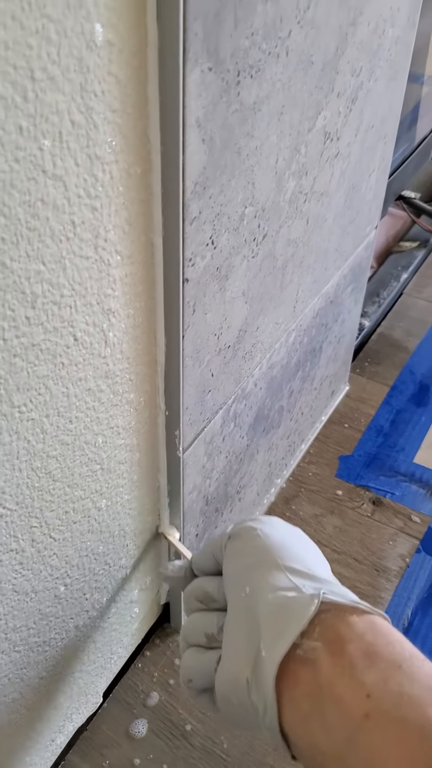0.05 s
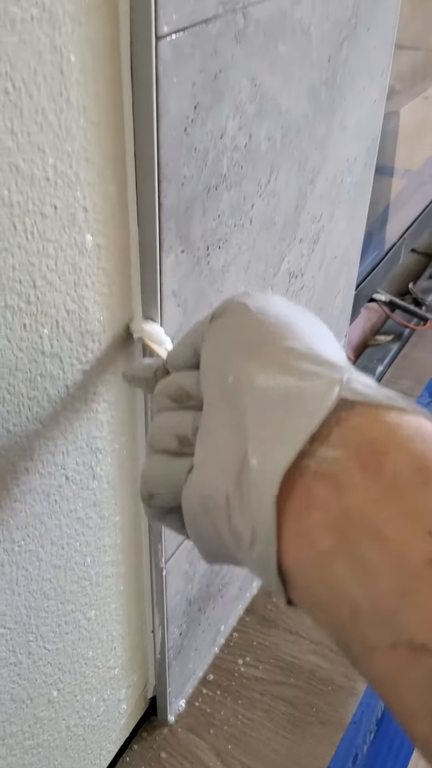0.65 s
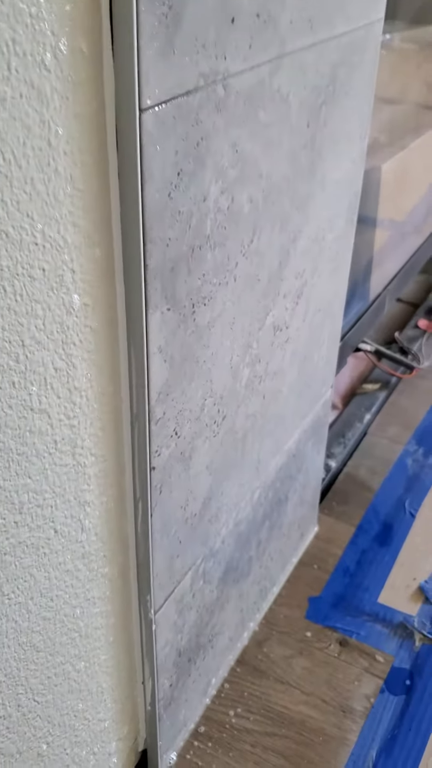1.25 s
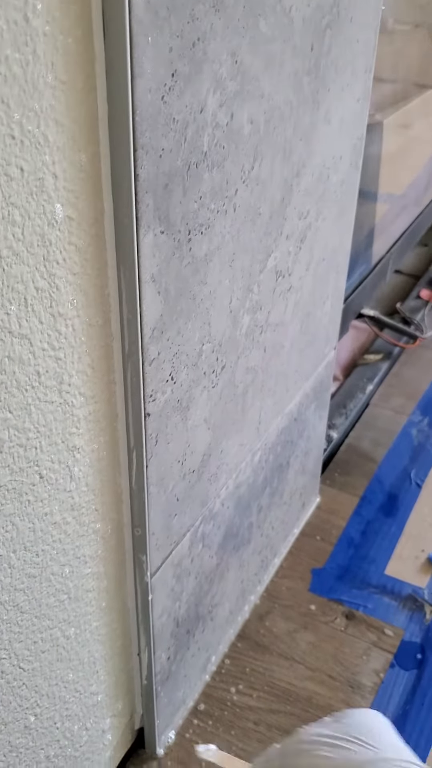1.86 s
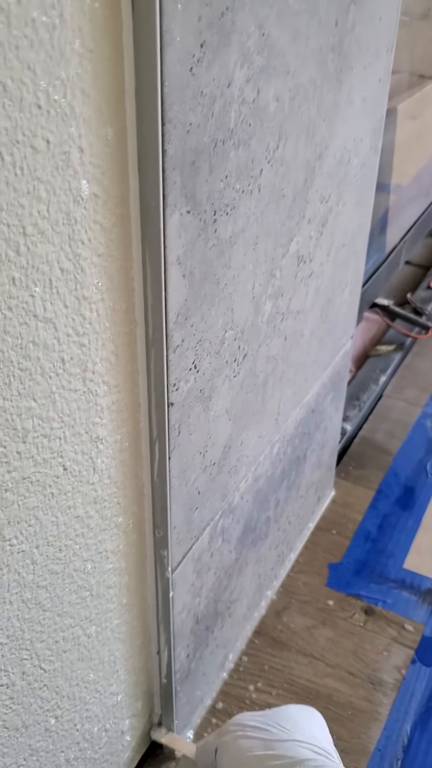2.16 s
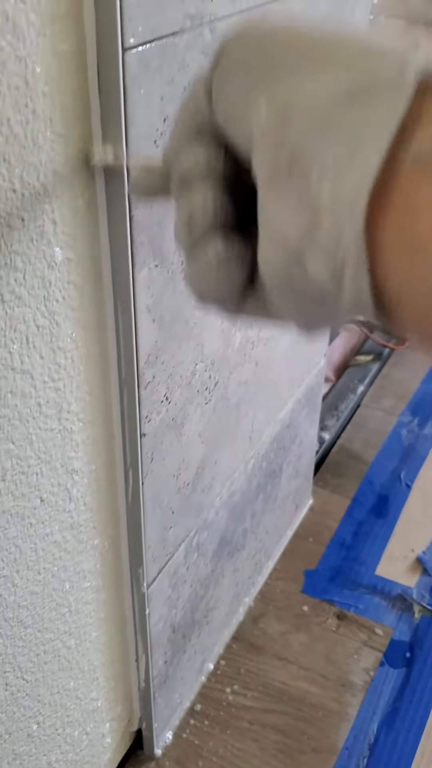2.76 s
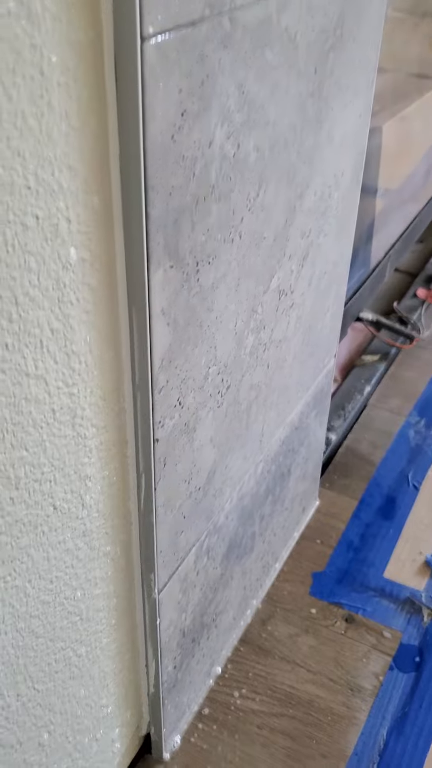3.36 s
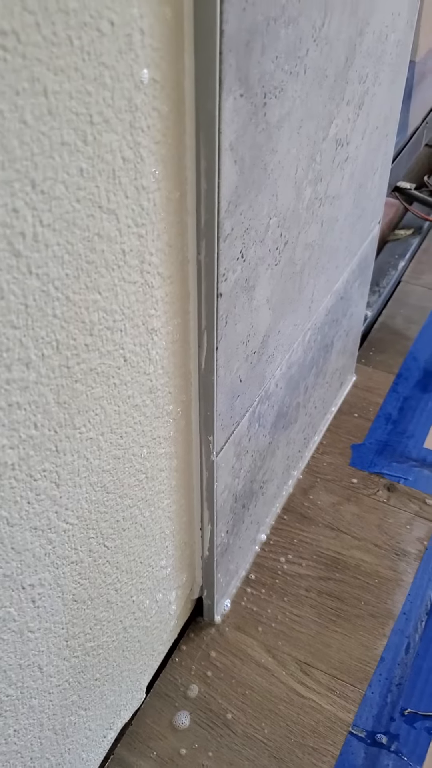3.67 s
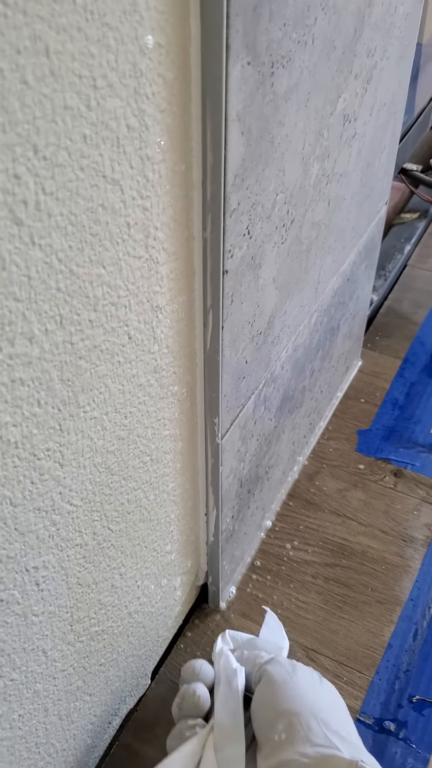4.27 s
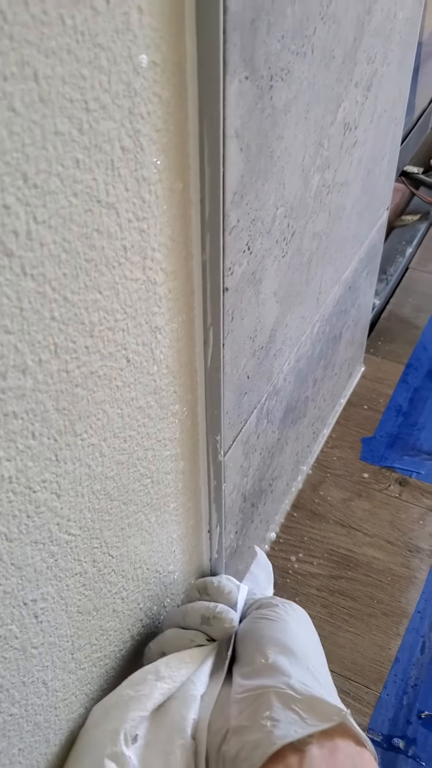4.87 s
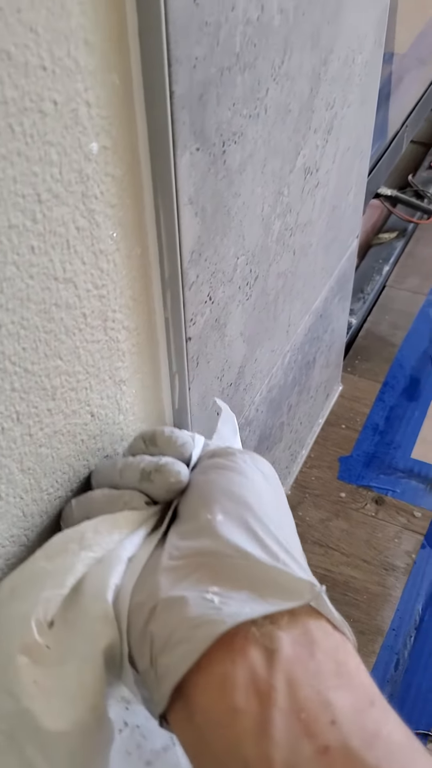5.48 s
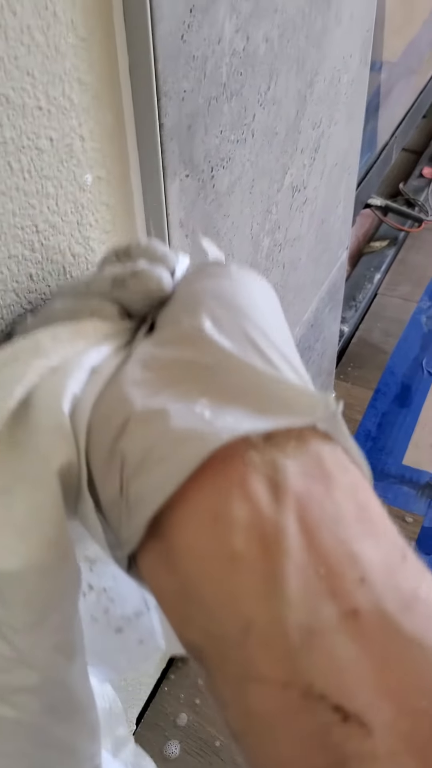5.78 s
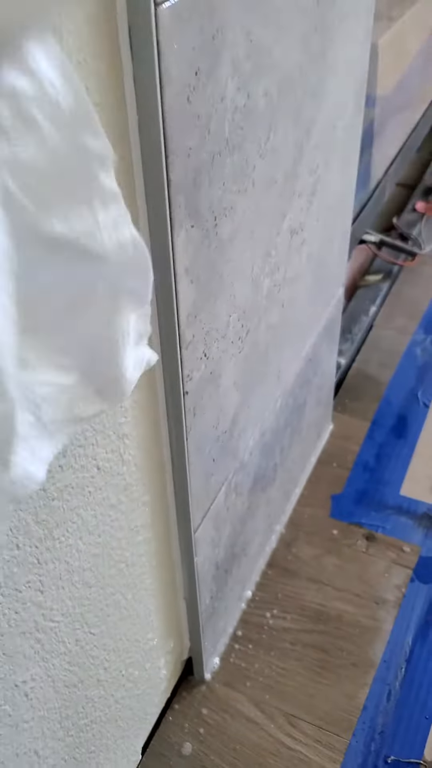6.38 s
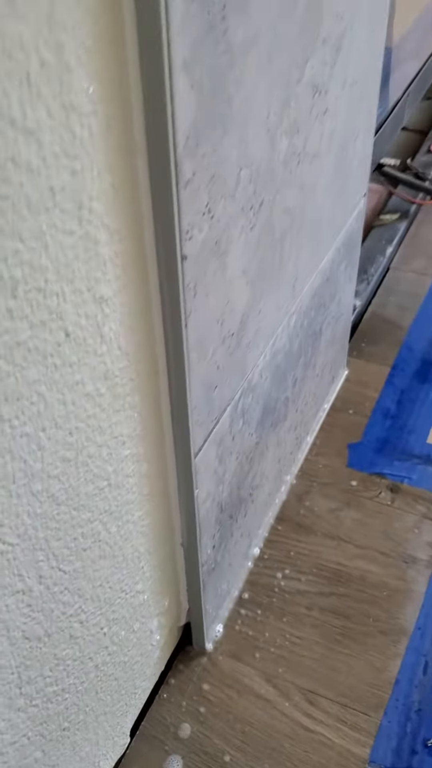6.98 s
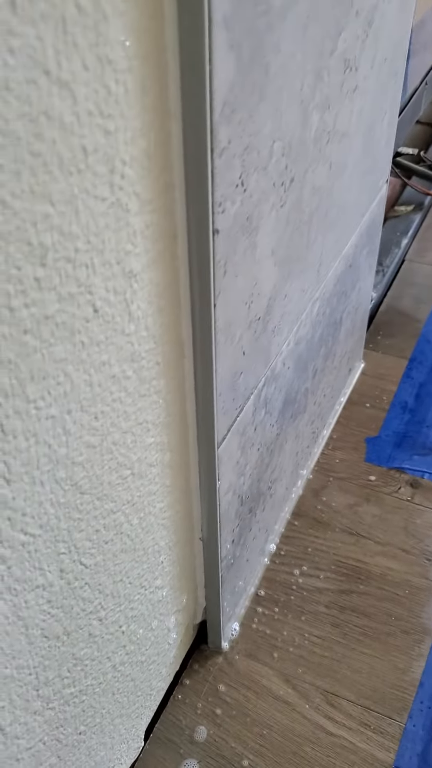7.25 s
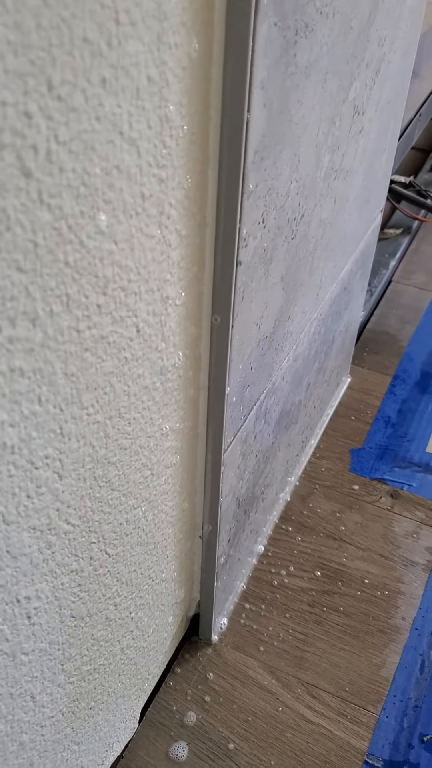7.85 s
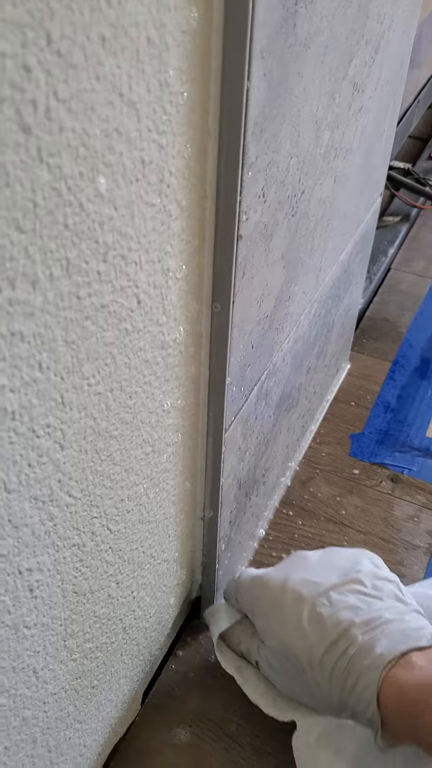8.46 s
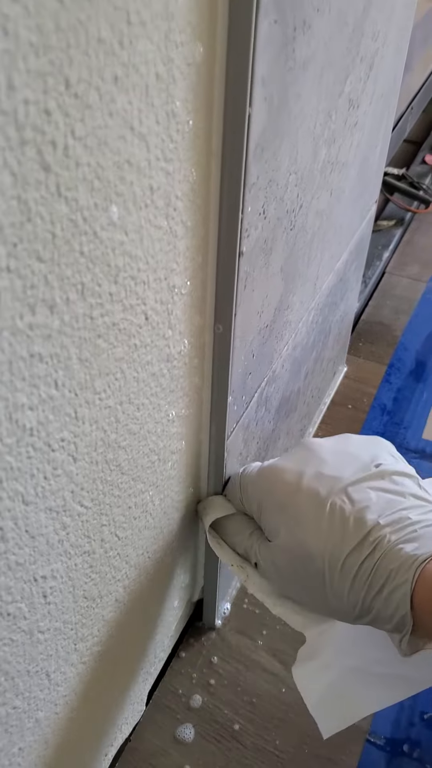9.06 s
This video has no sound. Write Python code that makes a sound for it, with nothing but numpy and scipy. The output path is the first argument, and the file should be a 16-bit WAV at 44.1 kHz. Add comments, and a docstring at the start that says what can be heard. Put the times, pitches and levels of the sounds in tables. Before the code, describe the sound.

In a bare room, a small stick rubs up a wall joint through soft sealant, with low hollow thuds. It is knocked once, sharply, then scrapes up bare plaster with a louder, chattering rasp. Small ticks follow as it is put down. A paper towel rustles, wipes the joint and flaps past the close microphone with puffs of air. A sleeve swishes, and the towel briefly dabs the wall.

```python
"""A bare room, at the joint between a tiled panel and a textured plaster wall. A gloved hand draws a small
stick up the joint twice, through soft sealant, then over bare plaster: its slips drum the hollow wall and
its catches ring the panel's metal trim. Between the strokes it is knocked once; after them it is put down,
with small ticks close by. A paper towel rustles, wipes the joint and flaps past the microphone, puffing
air at it. A sleeve swishes, and the towel dabs the wall."""
import sys
import numpy as np
from scipy import signal
from scipy.fft import rfft, irfft, next_fast_len
from scipy.io import wavfile

SR = 44100
rng = np.random.default_rng(int(sys.argv[2]) if len(sys.argv) > 2 else 0)


def generate_wav(sig):
    """Save sig (samples, or channels by samples) to the path in sys.argv[1] as 16-bit PCM at SR."""
    pcm = np.round(np.clip(np.atleast_2d(sig).T, -1, 1) * 32767).astype(np.int16)
    wavfile.write(sys.argv[1], SR, pcm)


N = 402191
T = np.arange(N) / SR

# hand pressure in each stroke: time_s, pressure_db
SEALANT_PRESSURE = [(0, -1), (0.2, 0), (0.58, 1), (0.7, -1), (0.79, 0.5), (0.95, 4), (1.075, 5.5),
                    (1.105, 1)]
PLASTER_PRESSURE = [(2.25, -26), (2.31, -16.5), (2.37, -5.5), (2.41, -1.5), (2.54, 0.5), (2.6, 0),
                    (2.66, 1), (2.79, -0.5), (2.83, -1.5), (2.93, -1), (2.97, -1), (3.0, -3.5), (3.02, -1),
                    (3.035, -4.5)]
WIPE_PRESSURE = [(4.78, -14.5), (4.99, -7), (5.04, -2.5), (5.32, 0.5), (5.7, 0), (6.2, -2.5), (6.32, -0.5),
                 (6.345, -13)]
DAB_PRESSURE = [(8.78, -11), (8.87, -6.5), (8.94, -2.5), (9.12, -1)]
# response of drum, board, rasp, scratch, hiss (a row each): level_db, db_per_pressure_db, climb_db
SEALANT_BANDS = [(-35, 0.37, 10), (-46, 1.7, 8.5), (-53.5, 2.3, -6.5), (-55, 1.74, 0), (-55, 0.17, 1.5)]
PLASTER_BANDS = [(-30.5, 0.97, -3), (-33, 0.94, 0.5), (-34.5, 1.18, 6), (-49.5, 1.4, 34), (-45.5, 0.89, -3)]
WIPE_BANDS = [(-46, 2.3, 11), (-49, 0.83, 7), (-46, 1.08, 0.5), (-52.5, 0.8, 8.5), (-55, 0.74, 10)]
DAB_BANDS = [(-86, 1.3, 12), (-91, 1.1, 12), (-67.5, 1.4, 4.6), (-56, 0.68, 1.4), (-52.5, 1.5, 1)]
# limits of those five bands: edge_hz
BAND_EDGES_HZ = (45, 220, 650, 2800, 5500, 17000)
# friction spectra of stick and grit: freq_hz, level_db
SEALANT_SPECTRUM = [(21, -71), (35, -39), (66, -2), (93, 2), (176, -7.5), (222, -15.5), (379, -19),
                    (684, -25), (979, -16.5), (1140, -23.5), (1550, -18.5), (3350, -28), (10600, -49.5),
                    (12100, -49), (16000, -48.5)]
PLASTER_SPECTRUM = [(21, -71), (35, -22), (82, 3), (108, 7.5), (210, 0), (258, 3), (334, -4.5), (370, -3.5),
                    (684, -13.5), (930, -11.5), (1200, -21.5), (1590, -21), (4220, -36.5), (8010, -52.5),
                    (10000, -55), (13000, -53.5), (16000, -57)]
GRIT_SPECTRUM = [(1000, -9), (4500, -9), (7000, 0.5), (9000, -13), (12000, 5), (16000, 8.5)]
# contact resonances: start_s, length_s, pitch_hz, width_hz, level_db, sink_oct_per_s
SQUEAKS = [(0, 0.13, 4250, 690, -54.5, 0.48), (0.17, 0.17, 3530, 320, -52.5, 0.9),
           (0.3, 0.16, 3520, 340, -53.5, 0.85), (0.47, 0.14, 3250, 300, -54.5, 0.13),
           (0.14, 0.16, 4740, 850, -53.5, 0.88), (0.22, 0.16, 2740, 260, -53, 0.8),
           (0.37, 0.14, 2385, 380, -55, 0.65), (0.62, 0.14, 1900, 230, -55, 1.0),
           (0.73, 0.19, 5200, 1000, -54.5, 0.73), (2.762, 0.088, 4630, 800, -40.5, 1.5),
           (2.85, 0.14, 4820, 650, -42, 1.4), (2.84, 0.18, 1600, 300, -34, 0.39),
           (2.95, 0.058, 2890, 340, -31, 0.093), (3.741, 0.016, 7200, 1080, -59.5, 0),
           (5.02, 0.2, 1750, 650, -57.5, 0.255), (5.25, 0.35, 1947, 600, -50.5, 0.2),
           (5.47, 0.27, 1200, 130, -51, 0.57), (5.42, 0.2, 2660, 394, -55.5, 0.44),
           (5.6, 0.66, 2056, 400, -49, 0.64), (5.88, 0.26, 4800, 800, -51.5, 0.82),
           (6.19, 0.14, 4770, 754, -62, 0.4)]
# wall pushed or springing back: start_s, length_s, pitch_hz, width_hz, relative_db
BOOMS = [(0, 0.2, 394, 90, -47), (0.789, 0.29, 375.6, 70, -56), (0.9, 0.22, 783, 260, -45),
         (2.316, 0.073, 387, 129, -39.5), (2.391, 0.07, 387.3, 100, -26.5), (2.44, 0.1, 275.6, 61, -26.5),
         (2.46, 0.09, 359, 90, -32.5), (2.68, 0.13, 507.4, 110, -31), (2.659, 0.15, 385.6, 91, -27),
         (2.68, 0.089, 131.3, 40.3, -21), (2.76, 0.054, 234, 70.5, -25), (2.765, 0.041, 150.4, 60, -20.5),
         (2.844, 0.113, 102.2, 26, -21.5), (3.001, 0.044, 386, 60, -35), (3.01, 0.025, 102.4, 30.2, -22.5),
         (5.006, 0.24, 385, 170, -45.5), (5.5, 0.27, 93.6, 36, -42), (6.287, 0.052, 400, 200, -45.5)]
# grit under the stick: start_s, length_s, level_db
GRIT = [(0.05, 0.65, -66), (0.68, 0.48, -60), (2.39, 0.22, -59), (2.64, 0.24, -51), (2.85, 0.19, -46)]
# lumps in the joint: start_s, peak_db
THUDS = [(0.129, -31), (0.194, -27), (0.245, -30), (0.42, -26.5), (0.46, -32), (0.516, -29.5), (0.654, -27),
         (0.745, -27), (0.835, -28.5), (0.9, -18), (0.965, -28), (1.063, -19)]
# ringing of wall and metal trim: pitch_hz, t60_s, relative_db
THUD_MODES = [(76.5, 0.18, -7), (100.9, 0.3, 0.5), (146, 0.12, 0.5), (180, 0.1, -4), (270, 0.064, -11.5),
              (365, 0.041, -8), (519, 0.07, -13.5)]
TRIM_MODES = [(943, 0.11, -28), (1058, 0.057, -30.5), (1428, 0.066, -27), (1569, 0.049, -22),
              (1778, 0.051, -21), (2030, 0.025, -18.5), (2390, 0.037, -26), (2970, 0.04, -28),
              (3390, 0.0254, -27), (4060, 0.022, -21), (4370, 0.018, -32), (4660, 0.015, -28)]
# stick catching on plaster bumps: start_s, level_db, lowpass_hz
CATCHES = [(0.511, -21, 1100), (0.806, -28, 1090), (0.923, -22, 1700), (0.986, -12.5, 6000),
           (0.997, -27, 3000), (1.05, -21, 3500), (1.07, -20.5, 4000), (1.094, -25, 3500),
           (2.319, -30, 2500), (2.3536, -36, 2600), (2.382, -16, 2580), (2.3924, -14, 2500),
           (2.4092, -11.5, 2680), (2.4175, -24, 2600), (2.4315, -22, 2700), (2.4413, -19, 4000),
           (2.4533, -7, 7000), (2.484, -3.5, 5400), (2.506, -15, 2600), (2.5229, -9.5, 2900),
           (2.5406, -8.5, 3830), (2.556, -10, 2810), (2.574, -16, 2600), (2.589, -18, 2600),
           (2.6052, -10, 2400), (2.6224, -10, 2600), (2.6405, -6, 6030), (2.647, -3.5, 2960),
           (2.6731, -8, 2400), (2.692, -6.5, 2400), (2.714, -9, 2470), (2.721, -7.5, 2490),
           (2.732, -7, 2450), (2.752, -23, 2400), (2.773, -14, 5000), (2.7805, -6, 7000), (2.8, -24, 5000),
           (2.8178, -18, 5500), (2.8457, -26, 4560), (2.8652, -15, 6000), (2.8827, -5, 5500),
           (2.9032, -8.5, 5000), (2.931, -9.5, 5000), (2.943, -14.5, 4700), (2.96, -5.5, 5330),
           (2.966, -6, 6100), (2.985, -11.5, 5000), (3.002, -14, 4000), (3.0098, -6, 5000),
           (3.015, -4, 4520), (3.021, -4.5, 4530)]
# click of a catch: freq_hz, level_db
CATCH_SPECTRUM = [(25, -33), (100, -1), (350, 4.5), (700, 1), (1600, 0), (3000, 1), (4600, -4), (6000, -11),
                  (9000, -23), (16000, -13)]
# trim rings more freely near the top of a stroke: time_s, gain_db
TRIM_RING = [(1.0, -2), (2.4, -7), (2.8, -6), (2.95, 4.5), (3.02, -3.5)]

# glove creaks, the stick's first brush on the plaster, stick scuffs on the floor: start_s, length_s, level_db
HANDLING_BRUSHES = [(1.42, 0.16, -62.5), (2.25, 0.024, -60.5), (3.28, 0.16, -58.5), (3.41, 0.13, -58.5)]
SCUFFS = [(3.745, 0.013, -67), (3.782, 0.027, -46.5), (3.79, 0.09, -51.5)]
# rustle of glove or held towel, scuff, tick: freq_hz, level_db
RUSTLE_SPECTRUM = [(240, -50), (400, -20.5), (512, -23), (645, -8), (979, -8.5), (1560, -6), (3640, 2),
                   (5430, -8), (7280, -8), (8630, -16), (12100, -15), (16000, -15)]
SCUFF_SPECTRUM = [(80, -16.5), (180, -3), (340, -0.5), (440, -8.5), (750, -13), (1000, -14.5),
                  (2000, -14.5), (2650, -14.5), (3500, -13), (4500, -19), (7200, -24), (9000, -36),
                  (15000, -40)]
TICK_SPECTRUM = [(25, -10), (100, 7.5), (300, 4), (450, -4), (1200, -8), (2500, -2.5), (3150, -5),
                 (3600, 2.5), (4200, -2.5), (5400, -7), (7200, -7), (9000, -18.5), (15000, -25)]
# stick knocked, a graze then the blow: start_s, level_db
KNOCKS = [(1.5603, -10), (1.5641, -4)]
# the knock's direct crack and reverberant clack: freq_hz, level_db
CRACK_SPECTRUM = [(25, -47), (100, -38), (300, 0.5), (780, -19), (1740, -12.5), (2800, -19.5), (3500, 4),
                  (4950, -1.5), (5650, -15), (7400, -7), (8200, -10), (12400, -21), (16000, -29)]
CLACK_SPECTRUM = [(59, -17), (100, -6), (219, -6), (322, -2.5), (471, -7.5), (721, -6.5), (818, -8),
                  (1310, -3.5), (1800, 1), (2470, 0), (4770, 2), (9500, -17.5), (12200, -21.5),
                  (16000, -33)]
# crack returning from near walls: delay_s, gain_db
SLAPS = [(0.0122, -24), (0.0155, -16.5), (0.0212, -13), (0.0345, -16), (0.0383, -18)]
# resonances of stick, clack and ticking glove: pitch_hz, width_hz, gain_db
STICK_MODES = [(944, 20, 13.5), (1600, 160, 3.5), (2000, 420, 9), (2690, 100, 0.5), (3380, 76, 7),
               (3950, 350, -0.5)]
CLACK_MODES = [(1865, 83, 3.5), (2150, 63, 5), (2510, 71, 7), (3370, 54, 5.5), (3520, 60, 5), (3810, 50, 7),
               (4300, 70, 5), (4580, 73, 6.5)]
TICK_MODES = [(3530, 610, 9.1), (4000, 290, 4.6)]
# close ticks: start_s, level_db, left_minus_right_db
TICKS = [(3.359, -41, 1), (3.415, -26, -18), (3.4841, -23.5, -21), (3.785, -19, -20), (3.8361, -29, -15),
         (3.909, -38.5, -16), (6.988, -41, -11), (7.6136, -36.5, -6), (7.665, -35, 4), (7.6968, -35, -6)]

# towel held, patting, flapping, brushing the wall, creasing: start_s, length_s, level_db
RUSTLES = [(3.91, 0.36, -57.5), (4.05, 0.12, -64), (4.26, 0.46, -55.5), (4.53, 0.16, -73),
           (4.74, 0.14, -65)]
PATS = [(4.828, 0.018, -46.5), (4.876, 0.031, -53), (5.012, 0.04, -48), (6.29, 0.045, -44),
        (9.04, 0.061, -47.5)]
FLAPS = [(6.36, 0.21, -71), (6.5, 0.24, -61), (6.75, 0.14, -55), (6.87, 0.098, -56), (6.985, 0.082, -53.5),
         (7.07, 0.31, -55.5), (7.36, 0.21, -63), (7.52, 0.12, -60.5), (7.6, 0.16, -61.5)]
BRUSHES = [(6.466, 0.008, -57), (6.87, 0.075, -60)]
CRINKLES = [(6.77, 0.012, -63), (6.81, 0.038, -54.5), (6.986, 0.0053, -54), (7.004, 0.025, -60),
            (7.079, 0.011, -55), (7.19, 0.049, -56), (7.272, 0.007, -58), (7.448, 0.006, -55),
            (7.522, 0.033, -55), (7.59, 0.0071, -57)]
# spectra of the moving paper: freq_hz, level_db
WIPE_SPECTRUM = [(21, -46), (35, -18), (93, 8), (222, -9.5), (252, -7), (379, -5), (602, -10), (1090, -6.5),
                 (1200, -10.5), (1770, -9.5), (3180, -24), (4560, -28), (8010, -38.5), (12100, -41),
                 (16000, -43)]
FLAP_SPECTRUM = [(140, 0), (230, -0.5), (265, 3), (520, -7.5), (1180, -10.5), (1710, -9), (2570, -12.5),
                 (3730, -6.5), (5520, -12), (7330, -13), (8910, -21), (11800, -19), (16000, -22)]
BRUSH_SPECTRUM = [(200, -7), (700, -5), (1600, 2), (2400, -7), (5000, -26), (16000, -35)]
CRINKLE_SPECTRUM = [(1000, -25), (3000, -14), (4300, 4.5), (5600, -7), (7200, 1), (9500, -7), (12000, -9),
                    (16000, 0)]
# air off the towel: start_s, relative_db
PUFFS = [(6.323, -40), (6.393, -48), (6.491, -29.5), (6.547, -25.5), (6.586, -27.5), (6.709, -35),
         (6.741, -29), (6.797, -34.5), (6.826, -33), (7.003, -29.5), (7.018, -36), (7.091, -36),
         (7.589, -41), (7.666, -42)]

# sleeve speed, as hiss level: time_s, relative_db
SLEEVE_SPEED = [(7.66, -61.5), (7.7, -57), (7.98, -46.5), (8.13, -45.5), (8.23, -49), (8.34, -48),
                (8.46, -48), (8.684, -56), (8.712, -78.5), (8.74, -68)]
# cloth hiss: freq_hz, level_db
SLEEVE_SPECTRUM = [(320, -43), (550, -14), (828, -11.5), (953, -12), (1180, -14), (1960, -10.5),
                   (2320, -14), (3590, -5.5), (4830, -11.5), (5330, -15.5), (7260, -12), (8130, -16),
                   (9770, -21), (12200, -14.5), (16000, -15.5)]
# resonance in that hiss: time_s, pitch_hz
SLEEVE_RESONANCE = [(7.7, 3180), (7.95, 3300), (8.12, 4000), (8.28, 3520), (8.45, 3930), (8.7, 3700)]
# taut weave buzzing: start_s, length_s, level_db
BUZZES = [(7.68, 0.75, -59), (7.84, 0.39, -70)]

# resonances of wall and microphone ports: pitch_hz, width_hz, gain_db
WALL_MODES = [(96, 5.6, 1), (258, 11, 2), (363, 21, 3.5), (500, 5.5, 0), (536, 55, 0), (990, 41, -2.5),
              (1037, 20, 4.5), (1380, 80, 2)]
PORT_MODES = [(4540, 730, 2), (7040, 470, 3.5), (12060, 950, 6)]
# room decay: freq_hz, t60_s
ROOM_T60 = [(80, 0.64), (250, 1.0), (1000, 1.3), (2000, 0.83), (4000, 0.68), (8000, 1), (15000, 0.5)]
# first echoes off near walls: delay_s, gain_db
ECHOES = [(0.011, -18.5), (.0152, -46), (.0228, -28)]
# room reverberation and background rumble: freq_hz, level_db
REVERB_SPECTRUM = [(60, 4.5), (300, 1.5), (1000, -6), (2100, -2), (4000, -10.5), (8000, -7.5),
                   (15000, -3.5)]
RUMBLE_SPECTRUM = [(15, -2.5), (25, -10.5), (92, 6), (185, -10.5), (256, -9.5), (575, -23), (1330, -26),
                   (1840, -18), (2760, -34), (4370, -27), (5570, -32), (6920, -28), (9840, -45.5),
                   (12200, -40.5), (16000, -37)]
# side signal coming straight from the contact point: freq_hz, power_share
DIRECT_SHARE = [(1500, 0.55), (3500, 0.35), (8000, 0.12)]
# stereo width: freq_hz, side_gain_db
STEREO_WIDTH = [(40, -9), (120, -17), (300, -10), (650, -4.5), (1300, -1), (3000, 0), (16000, 0.5)]
# stereo balance: freq_hz, left_minus_right_db
STEREO_LEAN = [(60, -1.8), (110, 1.5), (230, -1.5), (500, 2.5), (700, 2), (1000, 1.6), (1300, 0.5),
               (1650, 1), (2050, 0.5), (2850, -2), (4300, -2.5), (5300, -2.5), (6300, 3), (7400, -7),
               (8800, 0.5), (11500, -2), (15000, 5.5)]


def amp(db):
    """Decibels to gain."""
    return 10 ** (np.asarray(db) / 20)


def unit(x):
    """Scale mid/side to a mid rms of 1."""
    return x / np.sqrt(np.mean(x[0] ** 2) + 1e-20)


def at_hz(points, hz):
    """Read a table on a log-frequency axis."""
    freq_hz, value = np.transpose(points)
    return np.interp(np.log(np.maximum(hz, 1)), np.log(freq_hz), value)


def follow(curve, edge_s=0.01595):
    """A curve's sample span, soft-edged gate and values."""
    time_s, values = np.transpose(curve)
    corners_s = [time_s[0] - edge_s, time_s[0], time_s[-1], time_s[-1] + edge_s]
    span = (T > corners_s[0]) & (T < corners_s[-1])
    return span, np.interp(T[span], corners_s, [0, 1, 1, 0]), np.interp(T[span], time_s, values)


def place(x, span):
    """Set a short mid/side sound into silence."""
    out = np.zeros((2, N))
    out[:, span] = x
    return out


def add_at(out, start_s, x):
    """Mix x into out from start_s."""
    start = round(start_s * SR)
    out[..., start:start + x.shape[-1]] += x


def pan(x, lean_db):
    """Pan mid/side; positive is left."""
    return x + x[::-1] * (amp(lean_db) - 1) / (amp(lean_db) + 1)


def colour(x, spectrum):
    """Minimum-phase filter with the given spectrum."""
    length = x.shape[-1]
    size = 2 * next_fast_len(length // 2 + 4096)
    freq_hz = np.arange(size // 2 + 1) * SR / size
    cepstrum = irfft(np.log(amp(at_hz(spectrum, freq_hz))))
    cepstrum[1:size // 2] *= 2
    cepstrum[size // 2 + 1:] = 0
    return irfft(rfft(x, size) * np.exp(rfft(cepstrum)))[..., :length]


def band(x, low_hz, high_hz, order=3):
    """Butterworth band-pass."""
    return signal.sosfilt(signal.butter(order, [low_hz, high_hz], "band", fs=SR, output="sos"), x)


def lowpass(x, edge_hz):
    """Butterworth low-pass."""
    return signal.sosfilt(signal.butter(3, edge_hz, fs=SR, output="sos"), x)


def resonate(x, modes):
    """Each mode scales its own narrow band."""
    for hz, width_hz, db in modes:
        x = x + (amp(db) - 1) * signal.lfilter(*signal.iirpeak(hz, hz / width_hz, fs=SR), x + 1e-18)
    return x


def moving_peak(x, hz, width_hz, block=256):
    """Band-pass whose centre moves block by block."""
    out, state = np.zeros_like(x), np.zeros((2, 2))
    for i in range(0, len(hz), block):
        b, a = signal.iirpeak(hz[i], hz[i] / width_hz, fs=SR)
        out[:, i:i + block], state = signal.lfilter(b, a, x[:, i:i + block], zi=state)
    return out


def drift(per_s):
    """Random curve through Gaussian knots."""
    knots = rng.standard_normal(8192)
    return np.interp(T * per_s, np.arange(len(knots)), knots)


def swells(rows):
    """Gain of small movements, each a flattened half sine."""
    gain = np.zeros(N)
    for start_s, length_s, db in rows:
        span = slice(*np.searchsorted(T, [start_s, start_s + length_s]))
        gain[span] += amp(db) * np.sin(np.pi * (T[span] - start_s) / length_s).clip(0) ** 0.4
    return gain


def friction(slips_per_s, spread_db, hiss_gain, flutter_db):
    """Mid/side: tiny uneven slips over smooth hiss, under trembling pressure."""
    slips = (rng.random(N) < slips_per_s / SR) * amp(spread_db * np.minimum(rng.exponential(1, N), 3.5))
    slips = unit(slips * rng.choice([-1, 1], (2, N)))
    return (slips + hiss_gain * rng.standard_normal((2, N))) * amp(flutter_db * drift(90))


def rustle(rows, spectrum, grains):
    """Coloured friction grains swelling with each movement."""
    gain = swells(rows)
    span = gain > 0
    return place(gain[span] * unit(colour(grains[:, span], spectrum)), span)


def crumble(click, longest_s, share):
    """Three all-passes break a click into a cluster of the same colour."""
    for lag in rng.uniform(0.15, 1, 3) * longest_s * SR:
        a = np.r_[1, np.zeros(int(lag)), share]
        click = signal.lfilter(a[::-1], a, click)
    return click


def impact(click, longest_s, share):
    """A normalised click, crumbled separately for mid and side."""
    return np.array([crumble(click, longest_s, share) for _ in range(2)]) / np.abs(click).max()


def blows(rows, spectrum, crumble_s, share):
    """One coloured impact per row."""
    out, click = np.zeros((2, N)), colour(signal.unit_impulse(2048), spectrum)
    for start_s, db in rows:
        add_at(out, start_s, amp(db) * impact(click, crumble_s, share))
    return out


def floor_echo(x, delay_s, gain):
    """The floor reflection lags more as the hand climbs: a falling comb."""
    n = np.arange(x.shape[-1])
    late = n - SR * np.linspace(*delay_s, len(n))
    return x + gain * np.array([np.interp(late, n, channel) for channel in x])


def stroke(pressure, bands, spectrum, slips, rasp_hz, scratch_hz, lift_db, foot_s, foot_width_s, foot_db,
           flutter_db=0, echo_s=(0, 0), echo_gain=0):
    """Slips under pressure make the hollow wall drum, groan, rasp and scratch. Pairs are (foot, top)."""
    span, gate, pressure_db = follow(pressure)
    t = T[span]
    height = np.linspace(0, 1, len(t))
    shaken = colour(slips[:, span], spectrum)
    rasp = moving_peak(shaken, np.interp(height, [0, 1], rasp_hz), width_hz=760)
    scratch = moving_peak(shaken, np.interp(height ** 2, [0, 1], scratch_hz), width_hz=1200)
    lift = amp(np.interp(height, [0, 1], lift_db)) - 1
    # the board's groan sinks as the hand leaves the foot of the wall
    hollow_db = foot_db * np.exp(-((t - foot_s) / foot_width_s) ** 2)
    groan_hz = np.interp(t, [foot_s - foot_width_s / 2, foot_s + 0.72 * foot_width_s], [372, 290])
    groan = amp(hollow_db - 7) * moving_peak(shaken, groan_hz, width_hz=61)
    shaken = shaken + lift * (rasp + scratch) + groan
    combed = floor_echo(shaken, echo_s, echo_gain)
    hiss = floor_echo(colour(rng.standard_normal((2, N))[:, span], spectrum), echo_s, echo_gain)
    drum_drive_db = np.interp(t - 0.046, t, pressure_db)   # drumming trails the pressure
    drives_db = [drum_drive_db] + [pressure_db] * 4
    levels_db = [db + slope * drive_db + climb_db * (height - 0.5)
                 for (db, slope, climb_db), drive_db in zip(bands, drives_db)]
    levels_db[1] += hollow_db
    levels_db[4] += flutter_db * drift(45)[span]
    parts = zip([shaken, shaken, combed, combed, hiss], BAND_EDGES_HZ, BAND_EDGES_HZ[1:], levels_db)
    return place(gate * sum(amp(db) * unit(band(x, low, high)) for x, low, high, db in parts), span)


def stick_strokes():
    """The stick glides through soft sealant, then scrapes bare plaster."""
    sealant = stroke(SEALANT_PRESSURE, SEALANT_BANDS, SEALANT_SPECTRUM, friction(2600, 4.2, 0.75, 2.1),
                     rasp_hz=(2450, 1650), scratch_hz=(3400, 3100), lift_db=(4, 0),
                     foot_s=0.08, foot_width_s=0.1, foot_db=4,
                     flutter_db=3.5, echo_s=(0.00135, 0.0022), echo_gain=0.11)
    plaster = stroke(PLASTER_PRESSURE, PLASTER_BANDS, PLASTER_SPECTRUM, friction(600, 3.3, 0.14, 2.6),
                     rasp_hz=(2550, 1560), scratch_hz=(4450, 3000), lift_db=(11, 8),
                     foot_s=2.46, foot_width_s=0.06, foot_db=5,
                     flutter_db=3.0, echo_s=(0.0014, 0.0032), echo_gain=0.076)
    return sealant + plaster


def rubbed_modes(rows):
    """Narrow resonances shaken by friction, each swelling once, steady or sinking."""
    out = np.zeros((2, N))
    for start_s, length_s, hz, width_hz, db, sink_oct_per_s in rows:
        gain = swells([(start_s, length_s, db)])
        span = np.flatnonzero(gain)
        pitch_hz = hz * 2 ** (-sink_oct_per_s * (T[span] - start_s))
        noise = lowpass(rng.standard_normal((2, 2, len(span) + 8192)), width_hz / 2)
        shaking = (noise[0] + 1j * noise[1])[:, -len(span):] / noise.std()
        out[:, span] += gain[span] * np.real(shaking * np.exp(2j * np.pi * np.cumsum(pitch_hz) / SR))
    return out


def squeaks_and_booms():
    """Under stick or towel the joint squeaks thinly and the wall booms at steady pitches."""
    return rubbed_modes(SQUEAKS) + amp(-3) * rubbed_modes([(*row, 0) for row in BOOMS])


def grit():
    """Grit crackles under the stick, faint in sealant, harder on plaster."""
    return rustle(GRIT, GRIT_SPECTRUM, friction(700, 2.5, 0.15, 2.3))


def thuds(vary_db=2.5):
    """The stick rides over lumps; each knocks the wall's low modes."""
    t, out = T[:16384], np.zeros((2, N))
    tones = np.array([amp(db - 60 * t / t60_s) * np.sin(2 * np.pi * hz * t)
                      for hz, t60_s, db in THUD_MODES])
    signs = (-1) ** np.arange(len(tones))
    for start_s, db in THUDS:
        thud = signs * amp(vary_db * rng.standard_normal(len(tones))) @ tones
        add_at(out[0], start_s, amp(db) * thud / np.abs(thud).max())
    return out


def catches(vary_db=2.5, slip_count=48, slips_per_s=80, slip_lowpass_hz=2450):
    """Catches on plaster click and ring the trim; small dull slips chatter in the second stroke."""
    slips_s = 2.42 + (np.arange(slip_count) + rng.uniform(-0.45, 0.4, slip_count)) / slips_per_s
    chatter = [(start_s, -18 - 0.5 * rng.standard_normal(), slip_lowpass_hz) for start_s in slips_s]
    t, out = T[:4096], np.zeros((2, N))
    click = colour(signal.unit_impulse(len(t)), CATCH_SPECTRUM)
    tones = np.array([amp(db - 60 * t / t60_s) * np.exp(2j * np.pi * hz * t)
                      for hz, t60_s, db in TRIM_MODES])
    for start_s, db, lowpass_hz in CATCHES + chatter:
        crack = impact(click, longest_s=0.0009, share=0.49)
        strengths = amp(vary_db * rng.standard_normal(len(tones))) * rng.choice([-1, 1], len(tones))
        ring = amp(np.interp(start_s, *np.transpose(TRIM_RING))) * strengths @ tones
        hit = amp(db) * (crack + np.array([ring.imag, ring.real]))
        add_at(out, start_s, lowpass(hit, lowpass_hz))
    return out


def handling(room):
    """The glove creaks and ticks; the stick brushes the plaster as it first touches, and scuffs the floor as it
    is put down."""
    grains = friction(1200, 0.92, 1.0, 3.4)
    glove = rustle(HANDLING_BRUSHES, RUSTLE_SPECTRUM, grains)
    scuff = rustle(SCUFFS, SCUFF_SPECTRUM, grains)
    return in_room(glove + ticks() + scuff, room, wet_db=-14.5)


def knock(room):
    """The stick's bright crack slaps off near walls; a lower clack rings through the room."""
    crack = resonate(blows(KNOCKS, CRACK_SPECTRUM, crumble_s=0.0006, share=0.57), STICK_MODES)
    slaps = sum(amp(db) * np.roll(crack, round(delay_s * SR), axis=1) for delay_s, db in SLAPS)
    clack = resonate(blows(KNOCKS[-1:], CLACK_SPECTRUM, crumble_s=0.00031, share=0.15), CLACK_MODES)
    reverb = signal.fftconvolve(clack[:1], room, axes=1)[:, :N]
    return crack + band(slaps, 200, 8100, order=1) + amp(10.5) * reverb


def ticks():
    """Small ringing snaps, each from one point near the microphone."""
    out = np.zeros((2, N))
    click = resonate(colour(signal.unit_impulse(2048), TICK_SPECTRUM), TICK_MODES)
    for start_s, db, lean_db in TICKS:
        snap = amp(db) * crumble(click, longest_s=0.0006, share=0.3) / np.abs(click).max()
        add_at(out, start_s, pan(np.array([snap, np.zeros_like(snap)]), lean_db))
    return out


def loose_towel(room):
    """Paper rustles in the hand, later flaps past, brushing the wall as its creases give way."""
    fibres, creases = friction(1800, 0.8, 1.0, 0.89), friction(900, 1.1, 1.0, 1.0)
    held = pan(rustle(RUSTLES, RUSTLE_SPECTRUM, fibres), lean_db=-7)
    flap = pan(rustle(FLAPS, FLAP_SPECTRUM, creases), lean_db=-1)
    brush = pan(rustle(BRUSHES, BRUSH_SPECTRUM, creases), lean_db=-1)
    crinkles = pan(rustle(CRINKLES, CRINKLE_SPECTRUM, friction(2000, 1.8, 0.3, 1.0)), lean_db=-7)
    return in_room(held + flap + brush, room, wet_db=0) + in_room(crinkles, room, wet_db=-8)


def towel_strokes():
    """Paper fibres rub the wall, fine and dense: a long wipe, a short dab, a few pats."""
    fibres = friction(5000, 2.7, 0.77, 1.54)
    wipe = stroke(WIPE_PRESSURE, WIPE_BANDS, WIPE_SPECTRUM, fibres,
                  rasp_hz=(2330, 1580), scratch_hz=(4500, 3950), lift_db=(3, 6),
                  foot_s=5.05, foot_width_s=0.13, foot_db=5, echo_s=(0.0014, 0.0025), echo_gain=0.066)
    dab = stroke(DAB_PRESSURE, DAB_BANDS, WIPE_SPECTRUM, fibres,
                 rasp_hz=(1800, 1750), scratch_hz=(4100, 4000), lift_db=(9, 9),
                 foot_s=9.07, foot_width_s=0.04, foot_db=8)
    return wipe + dab + rustle(PATS, PLASTER_SPECTRUM, fibres)


def puffs(left_db=4.5, right_db=-13):
    """Left/right: each puff pushes mainly on the left microphone port, which swings back slowly."""
    t, out = T[:4096], np.zeros(N)
    swing = band(t * np.exp(-t / 0.0016), 54, 99, order=2)
    for start_s, db in PUFFS:
        add_at(out, start_s, amp(db) * swing / np.abs(swing).max())
    return out * amp([[left_db], [right_db]])


def sleeve(room, weave_hz=363, hz_per_db=4.5, sag_hz_per_s=48):
    """Sliding cloth hisses on the right; its weave buzzes, lower as it slows and slackens."""
    span, gate, speed_db = follow(SLEEVE_SPEED)
    t = T[span]
    cloth = colour(friction(5000, 2.5, 1.0, 0.93)[:, span], SLEEVE_SPECTRUM)
    resonance = moving_peak(cloth, np.interp(t, *np.transpose(SLEEVE_RESONANCE)), width_hz=1400)
    hiss = amp(speed_db - 0.96) * unit(cloth + amp(8.5) * resonance)
    threads = unit(band(rng.standard_normal((2, N))[:, span], 4.9, 92, order=2))
    pitch_hz = weave_hz + hz_per_db * (speed_db - speed_db.max()) - sag_hz_per_s * (t - t[0])
    buzz = swells(BUZZES)[span] * unit(threads * np.sin(2 * np.pi * np.cumsum(pitch_hz) / SR))
    return in_room(place(gate * (pan(hiss, lean_db=-4.5) + buzz), span), room, wet_db=-7)


def room_response():
    """Mid/side reverberation: first echoes plus noise dying band by band."""
    t = T[:int(1.2 * SR)]
    edges_hz = np.geomspace(35, 17000, num=13)
    onset = (1 + 0.5 * np.exp(-t / 0.012)) * np.clip((t - 0.004) / 0.0021, 0, 1)   # near walls first
    tail = np.zeros((2, len(t)))
    for low_hz, high_hz in zip(edges_hz, edges_hz[1:]):
        decay = onset * amp(-60 * t / at_hz(ROOM_T60, np.sqrt(low_hz * high_hz)))
        tail += band(rng.standard_normal(tail.shape), low_hz, high_hz) * decay / np.linalg.norm(decay)
    for delay_s, db in ECHOES:
        tail[:, round(delay_s * SR)] += amp(db) * np.array([1, rng.choice([-1, 1])])
    return colour(tail, REVERB_SPECTRUM)


def in_room(x, room, wet_db):
    """Direct sound plus reverberation."""
    return x + amp(wet_db) * signal.oaconvolve(x[:1], room, axes=1)[:, :N]


def port_skew(x, lag_s=0.00085, wander_s=0.00028):
    """The mid reaches the two ports out of step as the hand moves, forming part of the side."""
    mid, side = x
    lags_s = [lag_s + wander_s * drift(2), wander_s * drift(1.8)]
    skew = sum(np.interp(T - lag, T, mid) - np.interp(T + lag, T, mid) for lag in lags_s) / 2
    direct = colour(skew, [(hz, 10 * np.log10(share)) for hz, share in DIRECT_SHARE])
    scattered = colour(side, [(hz, 10 * np.log10(1 - share)) for hz, share in DIRECT_SHARE])
    return np.array([mid, direct + scattered])


def to_stereo(x):
    """Mid/side to left/right: narrow bass, wide treble."""
    side = colour(x[1], STEREO_WIDTH)
    left = colour(x[0] + side, [(hz, db / 2) for hz, db in STEREO_LEAN])
    right = colour(x[0] - side, [(hz, -db / 2) for hz, db in STEREO_LEAN])
    return np.array([left, right])


def scene():
    """All sources over the room's quiet rumble; whatever rubs the wall rings its modes."""
    room = room_response()
    contact = stick_strokes() + grit() + catches() + thuds() + towel_strokes() + squeaks_and_booms()
    wall = in_room(resonate(port_skew(contact), WALL_MODES), room, wet_db=-5.5)
    rumble = amp(-55.85) * unit(colour(rng.standard_normal((2, N)), RUMBLE_SPECTRUM))
    mid_side = wall + knock(room) + loose_towel(room) + handling(room) + sleeve(room) + rumble
    return to_stereo(mid_side) + puffs()


def record(dry, cutoff_hz=15900):
    """The microphone ports colour the treble; the top is cut."""
    top_cut = signal.ellip(12, 0.1, 80, cutoff_hz, fs=SR, output="sos")
    return signal.sosfilt(top_cut, resonate(dry, PORT_MODES))


dry = scene()
out = record(dry)
generate_wav(out)
```